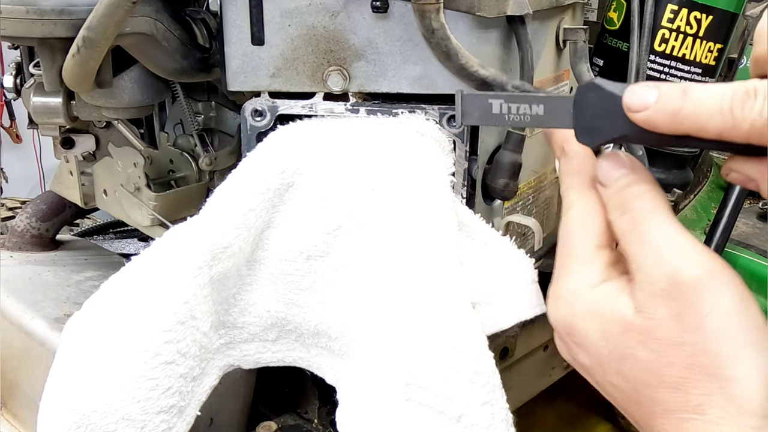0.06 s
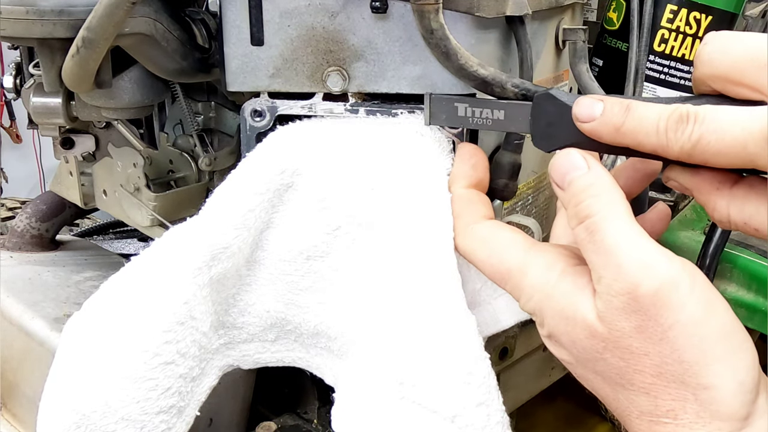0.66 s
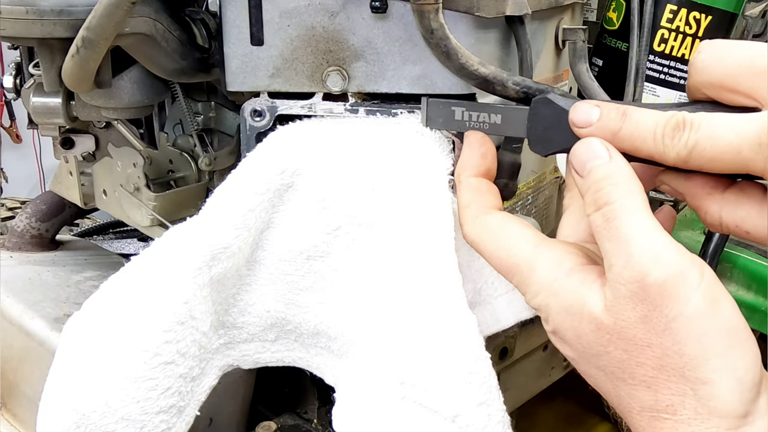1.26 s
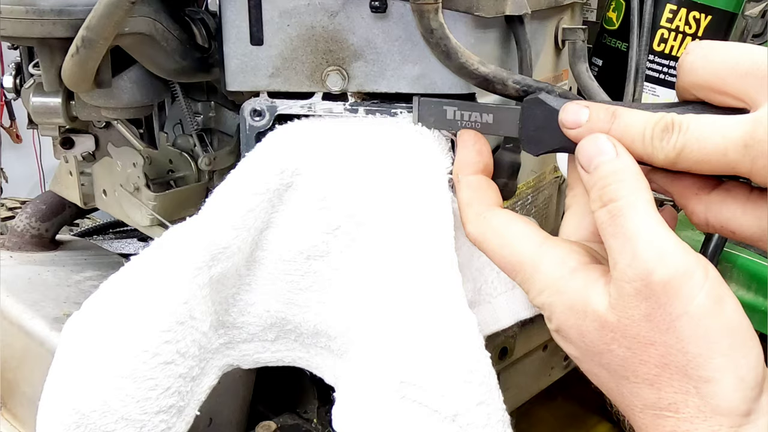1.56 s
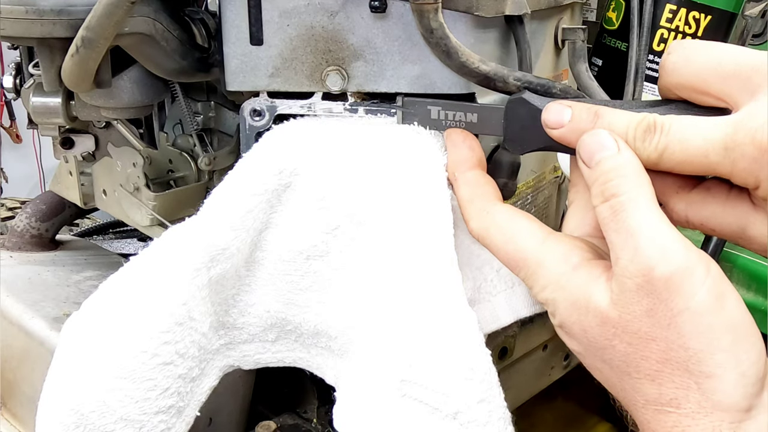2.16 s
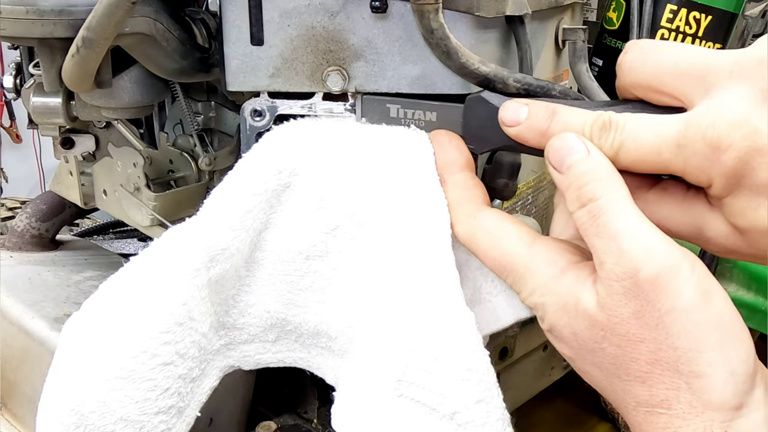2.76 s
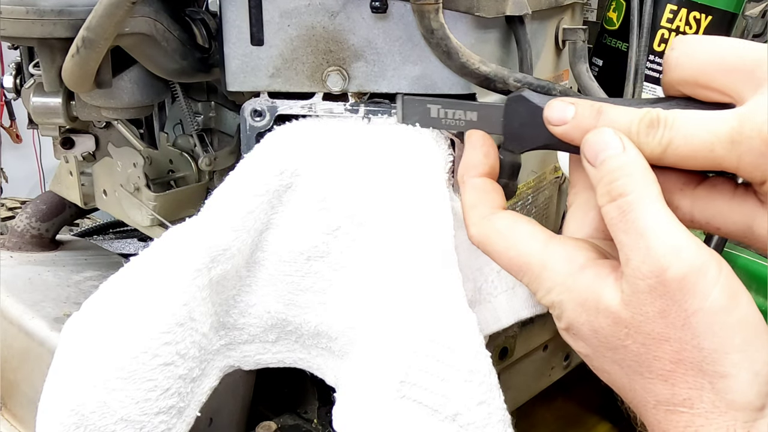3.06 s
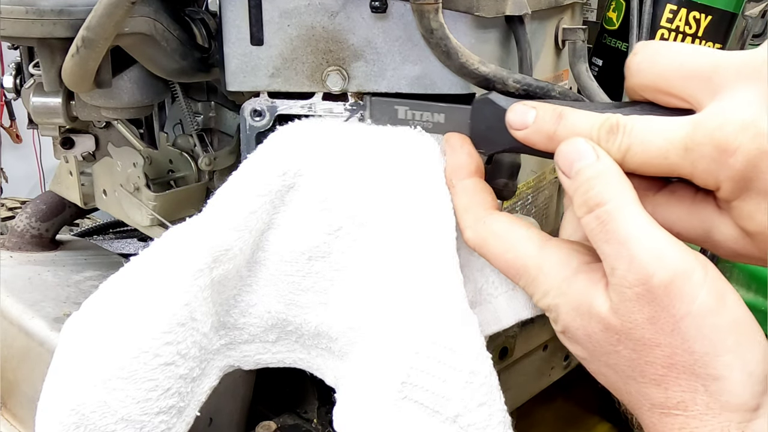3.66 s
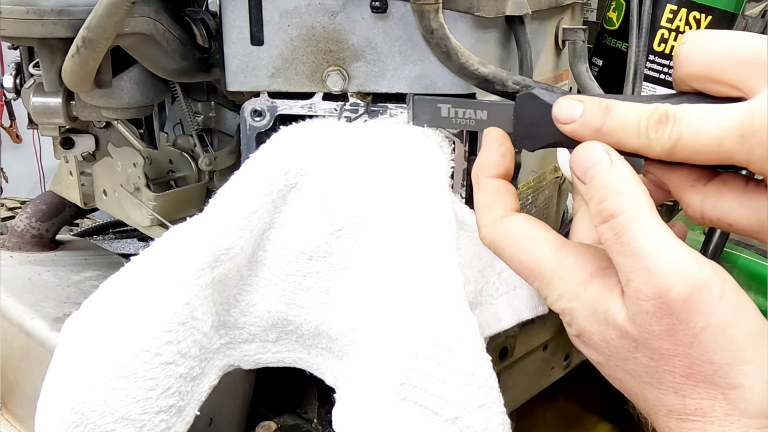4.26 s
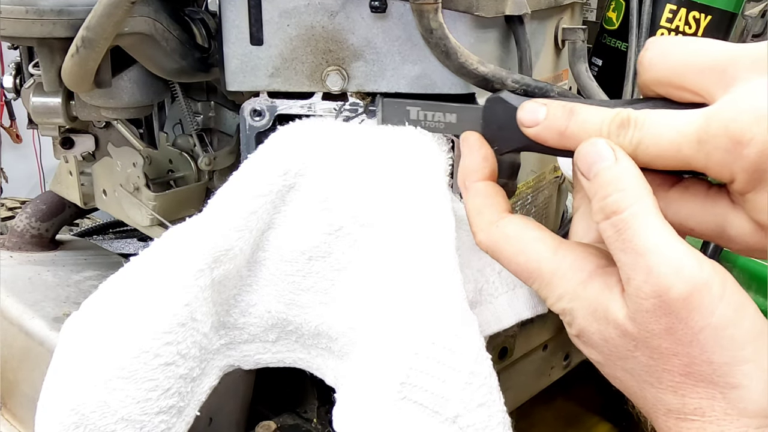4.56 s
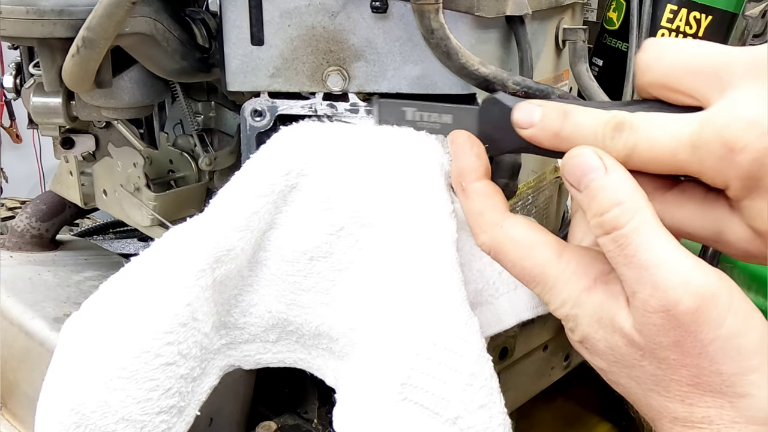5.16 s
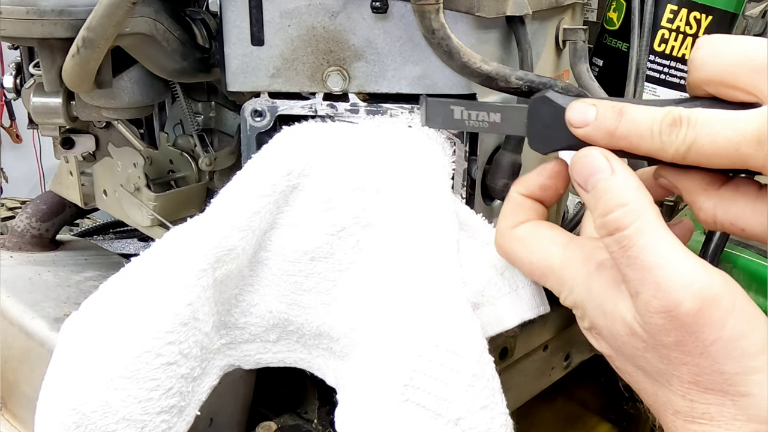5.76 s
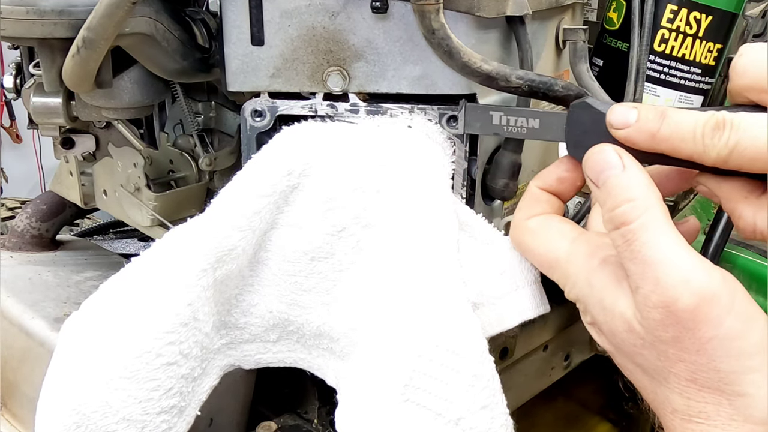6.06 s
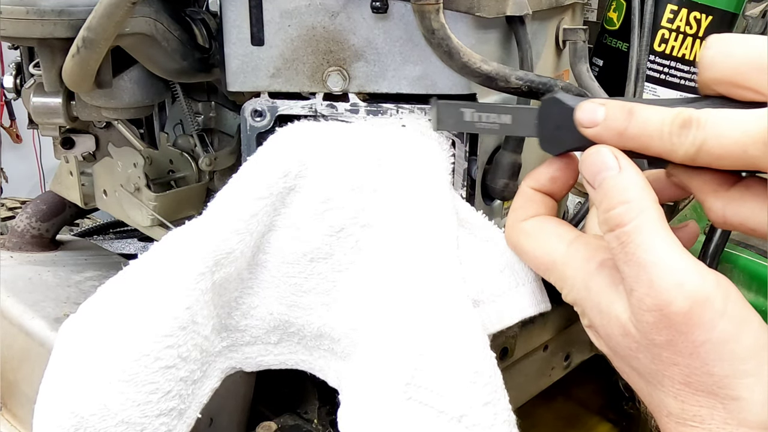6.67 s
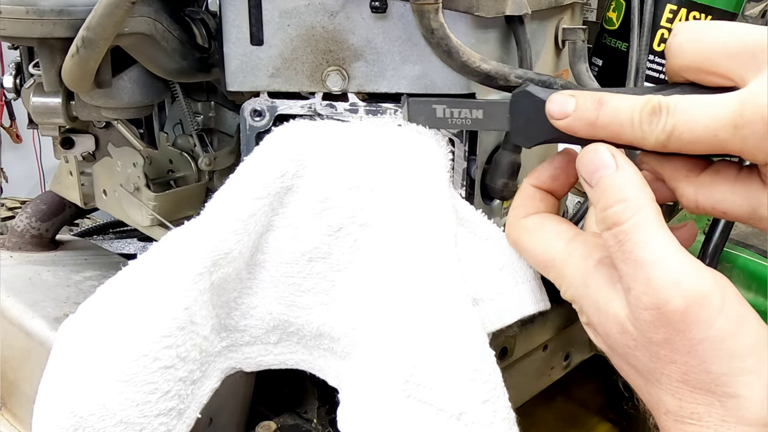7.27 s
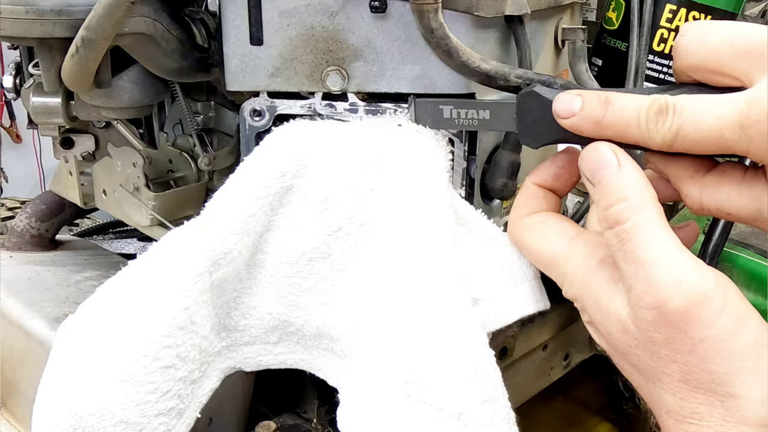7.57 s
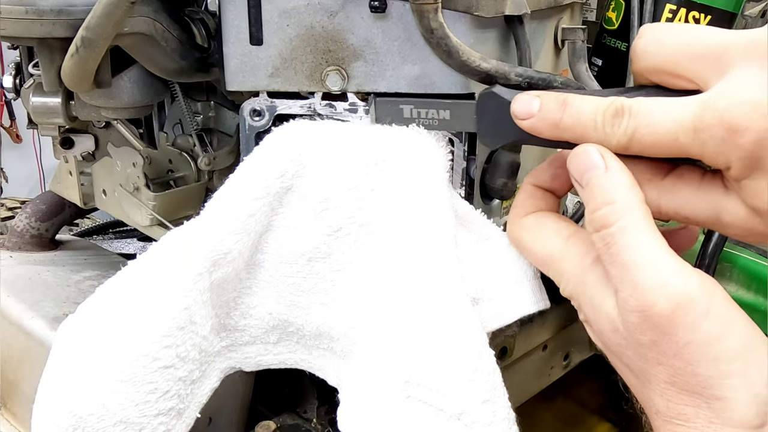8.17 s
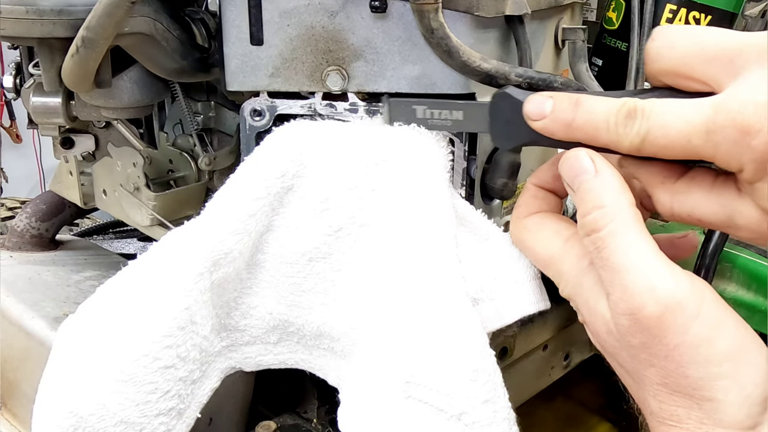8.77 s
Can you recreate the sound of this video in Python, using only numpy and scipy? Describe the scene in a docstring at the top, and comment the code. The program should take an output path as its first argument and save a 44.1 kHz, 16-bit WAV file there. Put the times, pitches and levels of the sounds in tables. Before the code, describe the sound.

A steel blade scrapes gasket from a metal engine surface in short, gritty strokes, sparse at first and then in quick uneven runs. Sharp ticks, small knocks, snapping flakes and a few faint squeaks fall among them, and the later strokes ring more. Fingers shift on a towel and swish near the end. The microphone is close, in a small workshop with a low rumble and short reflections.

```python
"""A small workshop, close up: a steel hand scraper works old gasket off an aluminium engine casting.
Hands rub on a towel over a low room rumble. Each stroke is a stream of tiny slips that rasps in the
gasket and rings the blade and the casting. The tool knocks, flakes snap off, the edge ticks on metal
and squeaks; near the end fingers swish and drag. The engine bay and the room add short reflections."""
import sys
import numpy as np
from scipy import signal
from scipy.fft import rfft, irfft
from scipy.io import wavfile
from scipy.ndimage import uniform_filter1d, map_coordinates

SR = 44100
rng = np.random.default_rng(int(sys.argv[2]) if len(sys.argv) > 2 else 0)


def to_wav(s):
    """Save 16-bit WAV."""
    ch = np.atleast_2d(s).T  # columns
    pcm = np.round(np.clip(ch, -1, 1) * 32767)  # PCM
    wavfile.write(sys.argv[1], SR, pcm.astype(np.int16))


N = 388962
TIME = np.arange(N) / SR
FREQ = np.maximum(np.arange(N // 2 + 1) * SR / N, 1)
BINS = np.maximum(np.fft.rfftfreq(8192, 1 / SR), 1)  # frequency grid for filter design
TOP_HZ = 15400

# EQ curves of the room's air and its rumble: f/Hz, level/dB
AIR_EQ = [(20, -4), (54, -7), (92, -3), (183, -6), (457, -28.5), (841, -29.5), (1210, -26.5), (2410, -41.5),
          (2770, -55), (5690, -29.5), (9900, -42.5), (15000, -64.5)]
RUMBLE_EQ = [(15, -20), (27, 0.5), (50, 0.5), (65, -7), (92, 0.5), (112, -11.5), (160, -10.5), (260, -25.5),
             (700, -57.5)]
# hands sliding on the towel, fader points: t/s, muffled rub/dB, dry brush/dB
HAND_SLIDES = [(0.0, -60, -70), (0.22, -66, -71.5), (0.55, -69, -76), (0.82, -72.5, -79.5),
               (1.15, -64, -72.5), (1.52, -68.5, -78.5), (2.13, -75, -80), (3.319, -71, -66),
               (3.928, -68.5, -75), (5.03, -59.5, -68.5), (5.31, -65.5, -62), (6.15, -63, -64),
               (7.06, -66, -86.5), (7.17, -61.5, -60.5), (7.39, -78, -66.5), (7.7, -67.5, -78.5),
               (8.0, -62, -68.5), (8.47, -61, -63.5), (8.82, -59.5, -66)]
# a hand shifts its hold: t/s, length/s, level/dB
GRIP_SHIFTS = [(0.589, 0.062, -49), (0.847, 0.13, -57), (1.745, 0.15, -60), (2.593, 0.32, -60.5),
               (4.423, 0.22, -60), (4.794, 0.17, -52.5), (5.177, 0.058, -48), (6.495, 0.15, -57),
               (6.715, 0.14, -59.5), (7.257, 0.16, -57.5), (7.532, 0.089, -48), (7.845, 0.12, -50)]
# scraper strokes: t/s, length/s, rasp/dB, blade ring over rasp/dB, depth of cut/0-1, swell/dB
SCRAPES = [ (0.356, 0.072, -72, -24, 0.45, -21), (0.618, 0.018, -56.5, -6, 0.45, -12),
           (1.358, 0.079, -73.5, 6.5, 0.7, 3), (1.751, 0.093, -63, 5, 0.38, 0),
           (2.425, 0.066, -60.5, 0.5, 0.4, -3), (2.782, 0.09, -52, 2.5, 0.63, 4),
           (3.15, 0.033, -45.5, -12, 0.66, 6), (3.193, 0.033, -62, 7.5, 1, 2),
           (3.268, 0.08, -71, 9.5, 0.89, -7), (3.404, .17, -62.5, 2, 0, -1),
           (3.612, 0.17, -63.5, -4, 0.1, 0), (3.764, 0.13, -60, 1, 0.5, -23),
           (3.895, 0.079, -58.5, -3.5, 0, 0), (4.08, 0.059, -60, -22, 0.5, 15),
           (4.136, 0.15, -63.5, -27, 0.04, 3), (4.298, 0.042, -51, 4.5, 0.84, -2.5),
           (4.355, 0.021, -65, 9, 1, 4), (4.42, 0.37, -61, -2.5, 0.35, -9),
           (4.718, 0.17, -56.5, -19, 0.2, 5), (4.869, 0.13, -57, -3, 0.62, -7),
           (5.068, 0.11, -55, -5, 0.28, 4.5), (5.179, 0.081, -52.5, -10, 0.27, -7),
           (5.268, 0.18, -59.5, 3, 0.2, -18), (5.427, 0.011, -60, 4, 0.88, 22),
           (5.808, 0.033, -53.5, 1, 0.88, 27), (5.87, 0.073, -63, 1.5, 0.82, 6),
           (6.38, 0.14, -62, 6.5, 0.47, -3), (6.486, 0.13, -59, 0, 0.15, 0),
           (6.665, 0.056, -57.5, 8.5, 0, 12), (6.729, 0.064, -64, 17, 0, 10),
           (6.865, 0.078, -60, 8, 0.59, 17), (7.099, 0.032, -63, 3, 0.3, 18),
           (7.143, 0.094, -62.5, 6, 0.65, 27), (7.244, 0.095, -57, 5, 0.49, -6),
           (7.367, 0.14, -63, 6.5, 0, 0), (7.545, 0.063, -60.5, 9, 0.8, 2),
           (7.725, 0.058, -68.5, 8.5, 0, -7), (7.819, 0.05, -60.5, 7, 0.6, 21),
           (7.869, 0.086, -56.5, 6.5, 0.66, -7), (7.995, 0.083, -67, 7.5, 0, 7),
           (8.114, 0.05, -58.5, 6.5, 0.17, 4), (8.153, 0.075, -58, 3.5, 0.43, -1),
           (8.315, 0.072, -59.5, 5, 0.35, 1), (8.42, 0.12, -59.5, 4.5, 0, -21),
           (8.566, 0.08, -59, 4, 0.2, 21), (8.696, 0.078, -56, 0.5, 0.34, -2)]
# the tool knocks on the casting: t/s, level/dB, tilt/(dB per octave), rattle decay/s
TOOL_KNOCKS = [(0.6086, -13, -3, 0.028), (1.146, -26, -10.5, 0.0035), (3.179, -16, -3.5, 0.0074),
               (3.185, -19, -3, 0.0036), (4.3062, -16.5, -11.5, 0.044), (4.319, -17, -5, 0.064),
               (5.003, -22.5, -12, 0.0089), (5.842, -28, 2.5, .008), (7.553, -20.5, -16, 0.059),
               (7.877, -23.5, -14, 0.053)]
# brittle flakes snap off: t/s, level/dB, tilt/(dB per octave), crackle decay/s
FLAKE_SNAPS = [(0.913, -22.5, -4, 0.051), (1.219, -19, -3, .055), (1.348, -23.5, -3.5, 0.05),
               (1.574, -24.5, -1.5, 0.093), (1.769, -27.5, -2.5, 0.041), (2.1348, -20.5, -2, 0.061),
               (2.223, -36, -5.5, .05), (5.188, -19, -4.5, 0.052), (7.2501, -15.5, -1, 0.0062),
               (7.52, -21, 3.5, 0.023)]
# the steel edge catches on metal: t/s, level/dB, chatter decay/s
EDGE_TICKS = [(0.9249, 0, 0.073), (2.802, -27, .008), (2.8274, -22, 0.008), (2.865, -23, 0.0088),
              (4.679, -29.5, 0.014), (4.836, -27, 0.015), (4.885, -38, .012), (5.002, -32, 0.0082),
              (5.244, -24, .006), (5.288, -22.5, 0.011), (5.891, -17.5, 0.0091), (5.9101, -20.5, 0.009),
              (6.256, -29.5, 0.054), (6.695, -24.5, 0.014), (6.769, -22, .01), (6.778, -23, .01),
              (6.7866, -13.5, 0.0039), (6.892, -26, .01), (7.109, -33.5, .008), (7.14, -28.5, .008),
              (7.16, -26, .008), (7.309, -23, 0.0089), (7.499, -4, 0.0058), (7.876, -29, .008),
              (8.166, -25, 0.0072), (8.345, -26, 0.0087), (8.49, -30, .008), (8.6012, -29, .008)]
# blade squeaks, then (last three rows) fingers swishing and rubbing low with a falling pitch:
# t/s, length/s, start f/Hz, width/Hz, level/dB, glide/(octaves/s)
SQUEAKS_AND_SWISHES = [(2.825, 0.04, 2090, 350, -43, 1), (3.16, .028, 1040, 120, -49, -0.5),
                       (4.103, 0.027, 2440, 650, -52, -2), (4.149, 0.2, 1800, 200, -66.5, -1.1),
                       (4.295, .026, 1240, 120, -49.5, -0.5), (4.73, 0.28, 2400, 220, -58, 0.26),
                       (4.865, 0.097, 6300, 300, -58, -1), (5.15, 0.11, 2510, 170, -59.5, 0),
                       (6.697, 0.028, 2470, 230, -49.5, -1), (8.204, 0.12, 2020, 350, -64, -2.4),
                       (8.457, 0.14, 2120, 350, -65.5, -2), (8.18, 0.44, 470, 160, -66, -0.6)]
# resonances of the hollow engine cover, pressed edge, blade and casting: f/Hz, width/Hz, level/dB
COVER_MODES = [(174, 47, -1.5), (278.3, 40, 1), (378, 42, -3), (493, 100, -11.5)]
EDGE_MODES = [(1138, 49, -4), (1648, 86, 3.5), (2190, 430, 1), (2466, 110, 9), (4570, 200, -7),
              (6070, 250, 1.5), (6920, 85, -11.5), (7780, 130, 0.5), (9430, 1540, -7.5)]
BLADE_MODES = [(2200, 96, -2), (2316, 65, 0.5), (2430, 37, -2), (2480, 50, -2.5), (3010, 78, -6.5),
               (3600, 160, -3), (4040, 140, -2), (4607, 315, -1), (5780, 160, -4), (6850, 280, -10.5)]
CASTING_MODES = [(430, 180, -7.5), (691, 79, -3.5), (758, 66, -1), (984, 60, -2), (1166, 88, 6),
                 (1254, 71, 0), (1593, 120, 4), (1915, 145, 3), (2480, 447, 2)]
# EQ curves of brushing skin, gasket rasp, hard crumbs, snapping flakes, a tick's crack: f/Hz, level/dB
SKIN_EQ = [(300, -0.5), (750, -5), (880, -8), (1150, 3), (1700, 2), (2300, -2), (3200, -6), (6000, -13),
           (10000, -45.5)]
RASP_EQ = [(400, -30), (900, -23), (1300, -9.5), (2400, 1), (2780, 5), (3300, 1.5), (5000, 4), (10000, -7),
           (11300, -18), (15000, -38)]
CRUMB_EQ = [(3000, -52), (6000, 19), (8500, -1), (12500, -8), (15000, -21)]
FLAKE_EQ = [(800, -23.5), (1200, 1), (1450, -6.5), (2000, 2.5), (2700, -7), (3600, -0.5), (4800, -1.5),
            (6000, 6.5), (8000, -5.5), (10000, 0.5), (11500, -17.5), (15000, -28)]
CRACK_EQ = [(300, -9.5), (600, -37), (900, -18.5), (1150, -4.5), (1800, -1), (3500, 12.5), (6500, -1.5),
            (8500, 0.5), (11000, -60), (13000, -85)]
# balance of the two microphone ports: f/Hz, left minus right/dB
PORT_BALANCE = [(100, -.5), (1500, -.3), (3500, -1.3), (4800, -5.3), (6000, -1.2), (7600, .9), (9000, -.3),
                (12000, 2.8)]
# phase between the ports: f/Hz, left lead/rad
PORT_LEAD = [(100, 0), (1200, -.2), (2400, -.6), (4000, -.85), (5300, -.35), (8000, -.3), (12000, -.2)]


def undb(db):
    """Decibels to gain."""
    return 10 ** (np.asarray(db) / 20)


def unit(x):
    """Scale to an energy of one."""
    return x / np.sqrt(np.sum(x ** 2) + 1e-18)


def add(track, start_s, sound):
    """Mix a sound into a track at its cue."""
    i = max(int(start_s * SR), 0)
    track[i:i + len(sound)] += sound[:max(N - i, 0)]


def through(x, response):
    """Pass a signal through an impulse response."""
    return signal.oaconvolve(x, response)[:len(x)]


def across(points, hz):
    """Read a curve on a log-frequency axis."""
    knots, values = np.transpose(points)
    return np.interp(np.log(hz), np.log(knots), values)


def causal(gain):
    """Minimum-phase impulse response of unit energy from gains at the frequencies BINS."""
    cepstrum = irfft(np.log(gain))
    log_spectrum = rfft(2 * cepstrum[:len(cepstrum) // 2], len(cepstrum))
    return unit(irfft(np.exp(log_spectrum)))


def colour(points, tilt_db=0):
    """Impulse response of an EQ curve, tilted by tilt_db per octave."""
    octave = np.log2(np.clip(BINS, points[0][0], points[-1][0]))
    return causal(undb(across(points, BINS) + tilt_db * octave))


def ring(modes, skirt=1.05, top_hz=9500):
    """Impulse response of damped resonances, which radiate little above top_hz."""
    power = sum(undb(db) ** 2 / (1 + ((BINS ** 2 - hz ** 2) / (BINS * width)) ** 2) ** skirt
                for hz, width, db in modes)
    return causal(np.sqrt(power) / np.hypot(1, (BINS / top_hz) ** 5))


def walk(rate_hz):
    """Smooth random wander with a spread of one."""
    hold = max(int(SR / rate_hz), 1)
    steps = np.repeat(rng.standard_normal(N // hold + 1), hold)
    wander = uniform_filter1d(steps, hold)[:N]
    return wander / wander.std()


def burst(t60, size=SR // 2):
    """Decaying noise: a dense run of impacts that dies away."""
    return unit(rng.standard_normal(size) * undb(-60 * TIME[:size] / t60))


def pressure(t, length, bite_s, release_s=0.0062):
    """Envelope of a contact that bites, is pushed for a while and lifts."""
    return (1 - np.exp(-t / bite_s)) * np.exp(-np.maximum(t - length, 0) / release_s)


def sway(x, sway_s, rate_hz=10):
    """The contact point moves, so its resonances drift slightly: a wandering delay bends the pitch."""
    return map_coordinates(x, [(TIME + sway_s * walk(rate_hz)) * SR], order=3)


def room_tone(air_db=-61, rumble_db=-53, wander_db=3, air_side_db=-12, rumble_side_db=-19):
    """A bed of steady workshop air and wavering low rumble, nearly alike in both ears."""
    wavering_db = rumble_db + wander_db * walk(12)
    out = 0
    for eq, db, side_db in ((AIR_EQ, air_db, air_side_db), (RUMBLE_EQ, wavering_db, rumble_side_db)):
        mid, side = (undb(db) * through(rng.standard_normal(N), colour(eq)) for _ in range(2))
        out = out + np.array([mid + undb(side_db) * side, mid - undb(side_db) * side])
    return out


def hands(fibre_db=2.0, drag_db=1.2, rise_s=0.023, fall_s=0.034, shift_brush_db=-7.5):
    """Skin and towel slide in uneven pulls: a dry brush, and a hollow rub in the cover beneath."""
    times, *faders_db = np.transpose(HAND_SLIDES)
    rub_gain, brush_gain = (undb(np.interp(TIME, times, db)) for db in faders_db)
    shifts = np.zeros(N)
    for start, length, db in GRIP_SHIFTS:
        add(shifts, start, undb(db) * pressure(TIME[:SR // 2], length - fall_s, rise_s, fall_s))
    pulls = undb(fibre_db * walk(150) + drag_db * walk(14))
    pulls /= np.sqrt(np.mean(pulls ** 2))
    rub = pulls * rng.standard_normal(N) * np.hypot(rub_gain, shifts)
    brush = pulls * rng.standard_normal(N) * np.hypot(brush_gain, undb(shift_brush_db) * shifts)
    towel_loss = np.hypot(1, (BINS / COVER_MODES[-1][0]) ** 3)  # the towel soaks up the treble
    muffled = causal(abs(rfft(ring(COVER_MODES))) / towel_loss)
    return through(rub, muffled) + through(brush, colour(SKIN_EQ))


def snags(per_s=60, size=2.2, fade_s=0.0045):
    """Hard specks in the gasket: now and then the force jumps and falls back, mostly a little."""
    hits = (rng.random(N) < per_s / SR) * np.minimum(rng.exponential(size=N), 2)
    return size * through(hits, np.exp(-TIME[:SR // 20] / fade_s))


def judder(rate_hz=190, jitter=0.37, slip_s=0.0024):
    """A digging edge sticks and jumps at an uneven rate; each jump fades before the next."""
    cycles = np.cumsum(rate_hz * np.exp(jitter * walk(rate_hz))) / SR
    jumps = np.exp(-(cycles % 1) / (rate_hz * slip_s))
    return jumps / np.sqrt(np.mean(jumps ** 2))


def scraping(slips_per_s=7000, grain=7, catch=2, catch_hz=260, drag_db=0.4, arch=7, judder_share=0.85):
    """Stick-slip forces on gasket, blade and casting: the edge catches, harder the deeper it cuts."""
    slips = rng.standard_normal((3, N)) * (rng.random(N) < slips_per_s / SR)
    roughness = grain * rng.standard_normal(N) + catch * walk(catch_hz)
    wander_db = drag_db * walk(45)
    specks, jumps = snags(), judder()
    forces = np.zeros((3, N))
    for start, length, rasp_db, ring_db, depth, swell_db in SCRAPES:
        # each pair runs from skimming to digging in
        grit = np.interp(depth, (0, 1), (0.27, 0.48))
        casting_db = np.interp(depth, (0, 1), (-21, 11.5))
        release_s = np.interp(depth, (0, 1), (0.012, 0.0093))
        bite_s = 0.028 ** (1 - depth) * 0.0015 ** depth  # a skim eases in, a deep cut bites at once
        i = int(start * SR)
        t = TIME[:min(int(length * SR) + SR // 10, N - i)]
        part = slice(i, i + len(t))
        progress = np.minimum(t / length, 1)
        arch_db = arch * (1 - grit) * np.sin(np.pi * progress)  # a smooth stroke is fastest midway
        push = pressure(t, length, bite_s, release_s)
        push *= undb(arch_db + swell_db * progress + grit * roughness[part] + wander_db[part])
        push *= 1 + grit * specks[part]
        push *= 1 + judder_share * depth * (jumps[part] - 1)
        for force, slip, db in zip(forces, slips, (0, ring_db, casting_db)):
            add(force, start, undb(rasp_db + db) * unit(slip[part] * push) * np.sqrt(length * SR))
    return forces


def gasket_rasp(force, rasp_db=-4, edge_db=-2):
    """Old gasket tears with a broad rasp, coloured by the pressed edge."""
    rasp = undb(rasp_db) * abs(rfft(colour(RASP_EQ)))
    edge = undb(edge_db) * abs(rfft(ring(EDGE_MODES)))
    tearing = through(force, causal(np.hypot(rasp, edge)))
    return np.hypot(undb(rasp_db), undb(edge_db)) * sway(tearing, sway_s=0.0005)


def blade_ring(force, steel, level_db=-1, crossover_hz=3300):
    """The steel blade rings under the strokes; its high modes drift more than its low ones."""
    ringing = through(force, steel)
    low = signal.sosfiltfilt(signal.butter(4, crossover_hz, fs=SR, output="sos"), ringing)
    return undb(level_db) * (sway(low, sway_s=0.0003) + sway(ringing - low, sway_s=0.0007))


def casting_crunch(force, crumbs_db=-21):
    """The casting answers digging strokes with a short ring; hard crumbs crunch under the edge."""
    body = sway(through(force, ring(CASTING_MODES)), sway_s=0.00117)
    return body + undb(crumbs_db) * through(force, colour(CRUMB_EQ))


def tool_knocks(contact_db=-12, rattle_db_per_s=219):
    """The tool hits the casting and rattles; the longer the rattle, the less the first blow stands out."""
    out, body = np.zeros(N), ring(CASTING_MODES)
    for start, db, tilt_db, rattle_s in TOOL_KNOCKS:
        blow = undb(rattle_db_per_s * rattle_s) * burst(rattle_s)
        blow[0] += 1  # the first impact
        knock = through(blow, body) + undb(contact_db) * through(blow, colour(RASP_EQ))
        tilt = colour([(900, 0), (8000, 0)], tilt_db)
        add(out, start, undb(db) * unit(through(knock, tilt)))
    return out


def flake_snaps(attack_share=0.013):
    """Brittle flakes of gasket break away in short crackles."""
    out = np.zeros(N)
    for start, db, tilt_db, crackle_s in FLAKE_SNAPS:
        crackle = burst(crackle_s)
        attack = 1 - np.exp(-TIME[:len(crackle)] / (attack_share * crackle_s))
        add(out, start, undb(db) * through(unit(crackle * attack), colour(FLAKE_EQ, tilt_db)))
    return out


def bending_click(spread_s=0.0026, size=2048):
    """A blow that has run along the blade: in bending waves the highs arrive first."""
    hz = np.fft.rfftfreq(size, 1 / SR)
    ring_hz = BLADE_MODES[1][0]
    dispersion = 2 * np.sqrt(ring_hz * hz) - hz * np.sqrt(ring_hz / TOP_HZ)
    fade = np.hanning(2 * size)[size:]
    return irfft(np.exp(-2j * np.pi * spread_s * dispersion)) * fade


def edge_ticks(steel, chatter_db=-9, steel_db=-3, crack_db=-8, casting_db=-19, cover_db=-22,
               free_db=-15, free_damping=0.49):
    """The edge catches on metal, jolts the casting and the hollow cover, and bounces clear."""
    clicks, chatters, click = np.zeros(N), np.zeros(N), bending_click()
    for start, db, chatter_s in EDGE_TICKS:
        add(clicks, start, undb(db) * click)
        add(chatters, start, undb(db + chatter_db) * burst(chatter_s))
    layers = ((steel_db, steel), (crack_db, colour(CRACK_EQ)),
              (casting_db, ring(CASTING_MODES)), (cover_db, ring(COVER_MODES)))
    jolts = sum(undb(db) * through(clicks + chatters, body) for db, body in layers)
    # once clear, the blade rings on in a close pair of bending modes, less damped than when pressed
    free = ring([(hz, width * free_damping, db) for hz, width, db in BLADE_MODES[1:3]])
    return jolts + undb(free_db) * through(clicks, free)


def squeaks_and_swishes(judder_db=4, judder_hz=120):
    """The blade squeaks, fingers swish and rub low: juddering slips through one gliding resonance."""
    out = np.zeros(N)
    slips = rng.standard_normal(N) * undb(judder_db * walk(judder_hz))
    for start, length, hz, width, db, glide in SQUEAKS_AND_SWISHES:
        t = TIME[:int(length * SR) + SR // 20]
        band = through(slips[int(start * SR):][:2 * len(t)], ring([(hz, width, 0)], skirt=1.14))
        gliding = map_coordinates(band, [np.cumsum(2 ** (glide * t))], order=3)
        slide = unit(gliding * pressure(t, length, bite_s=0.005))
        add(out, start, undb(db) * slide * np.sqrt(length * SR))
    return out


def workshop(x, bay_db=-11, bay_lag_s=0.0026, bay_t60_s=0.05,
             room_db=-15, room_lag_s=0.008, room_t60_s=0.32, scatter_db=-9):
    """Quick reflections inside the engine bay, then the dull short tail of the room, in stereo."""
    walls = colour([(200, 4), (1000, 5), (2500, -5), (6000, -7.5), (14000, -0.5)])
    bay = colour([(200, 1), (1500, 6), (4000, -4), (14000, 0.5)])  # strongest near 1.5 kHz
    echoes = np.zeros((3, N))
    for echo in echoes:
        add(echo, bay_lag_s, undb(bay_db) * through(burst(bay_t60_s), bay))
        add(echo, room_lag_s, undb(room_db) * through(burst(room_t60_s), walls))
    centre, *sides = echoes[:, :SR // 2]
    # the shortest waves scatter differently to each side
    sheen = colour([(3000, -30.5), (9000, 1), (12000, -1)])
    scatter = [undb(scatter_db) * through(burst(bay_t60_s), sheen) for _ in sides]
    return np.array([x + through(x, centre + side + treble) for side, treble in zip(sides, scatter)])


def scene():
    """Scraper and hands in the workshop's reflections, over the room tone."""
    on_gasket, on_blade, on_casting = scraping()
    steel = ring(BLADE_MODES, top_hz=9200)
    gasket = gasket_rasp(on_gasket) + flake_snaps()
    blade = edge_ticks(steel) + blade_ring(on_blade, steel)
    casting = casting_crunch(on_casting) + tool_knocks()
    return workshop(gasket + blade + casting + squeaks_and_swishes() + hands()) + room_tone()


def record(dry, hiss_db=-89):
    """Two microphone ports with their own colour, lag and faint hiss, then a steep high cut."""
    left = undb(across(PORT_BALANCE, FREQ) / 2) * np.exp(0.5j * across(PORT_LEAD, FREQ))
    heard = irfft(rfft(dry) * np.array([left, 1 / left]), N)
    hiss = undb(hiss_db) * rng.standard_normal((2, N))
    high_cut = signal.ellip(8, 0.2, 70, TOP_HZ, fs=SR, output="sos")
    return signal.sosfilt(high_cut, heard + hiss, axis=-1)


dry = scene()
out = record(dry)
to_wav(out)
```